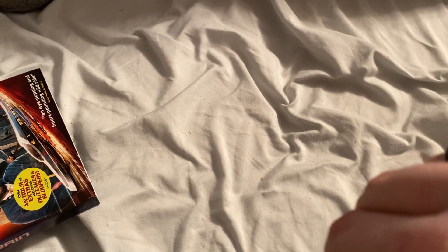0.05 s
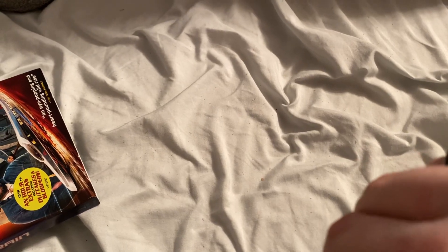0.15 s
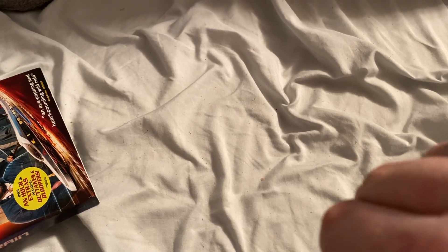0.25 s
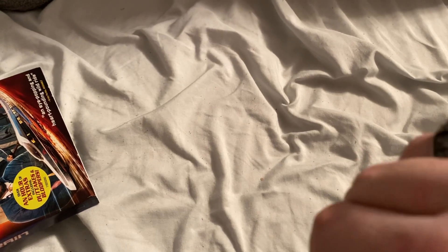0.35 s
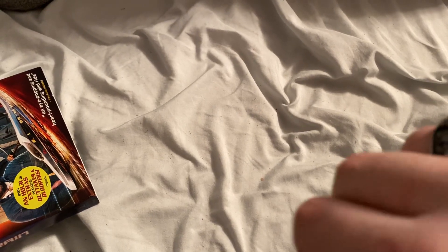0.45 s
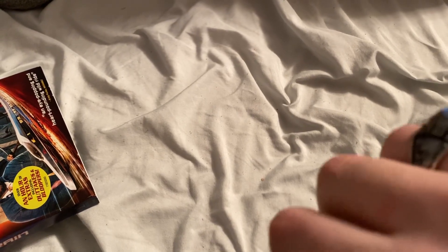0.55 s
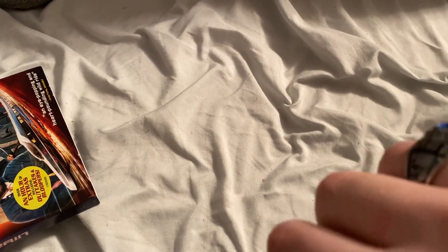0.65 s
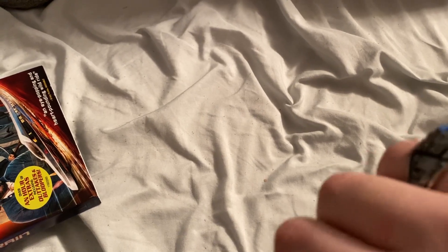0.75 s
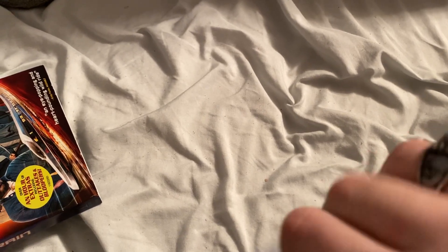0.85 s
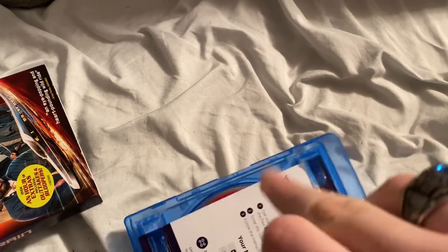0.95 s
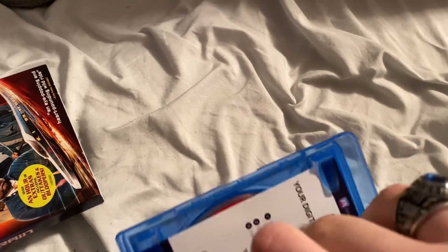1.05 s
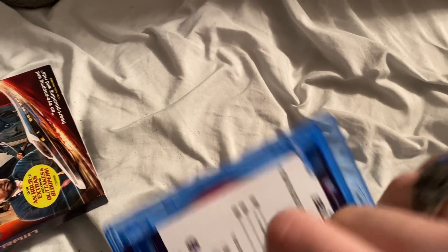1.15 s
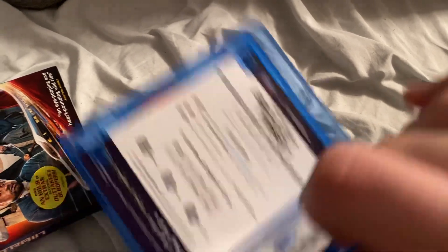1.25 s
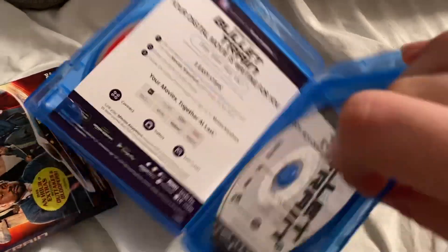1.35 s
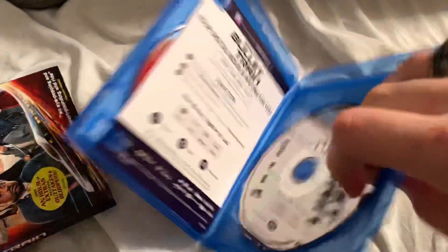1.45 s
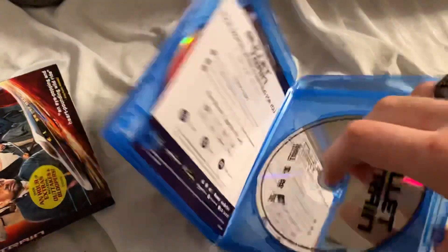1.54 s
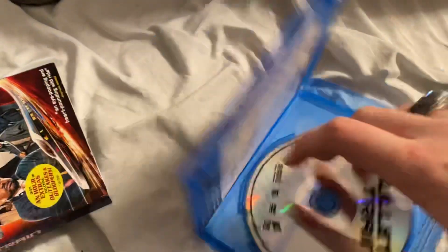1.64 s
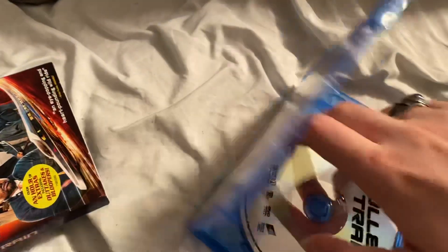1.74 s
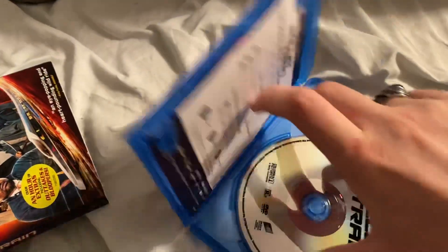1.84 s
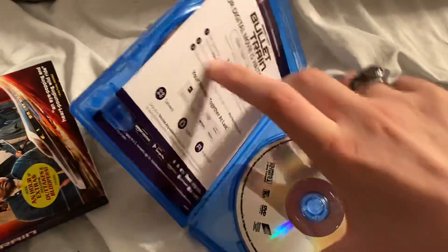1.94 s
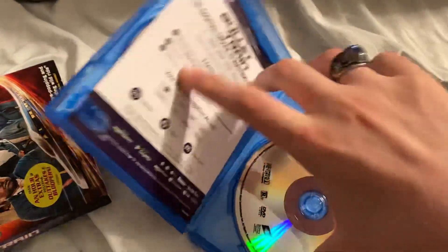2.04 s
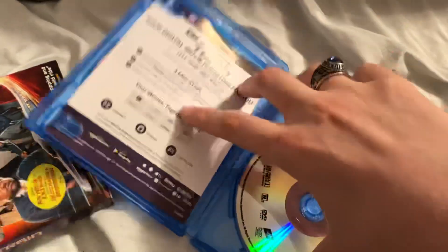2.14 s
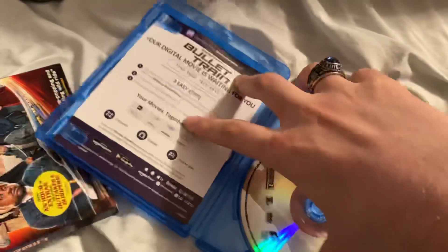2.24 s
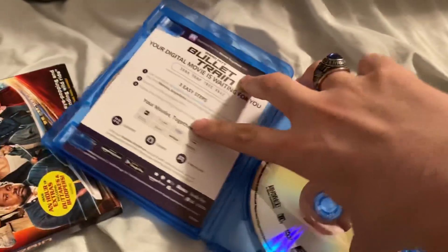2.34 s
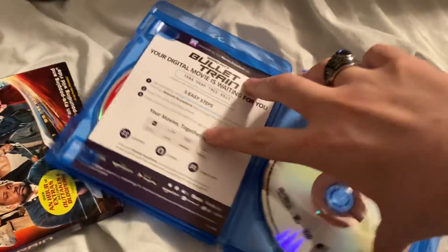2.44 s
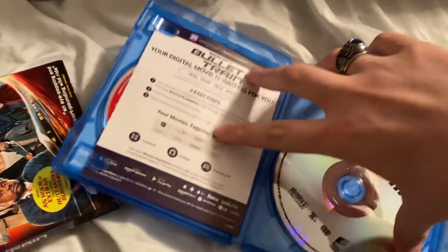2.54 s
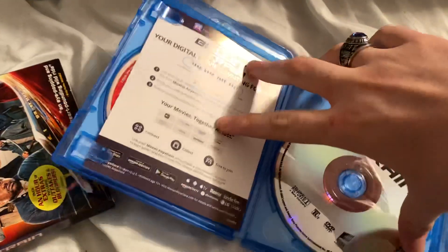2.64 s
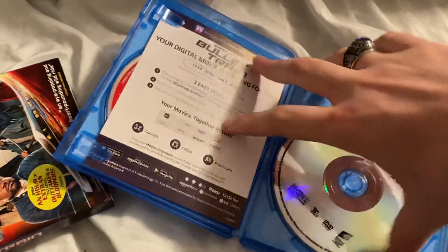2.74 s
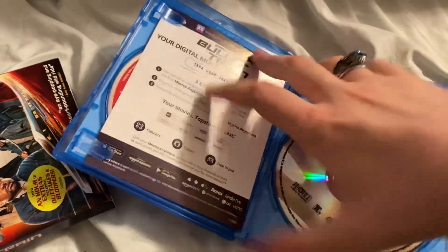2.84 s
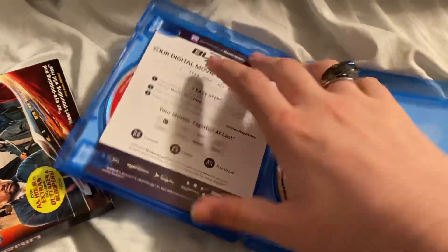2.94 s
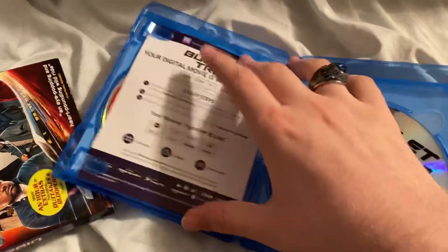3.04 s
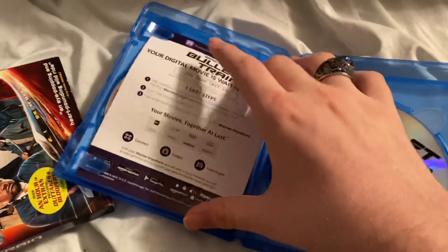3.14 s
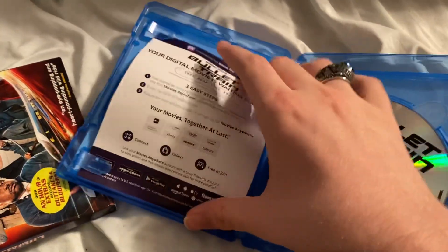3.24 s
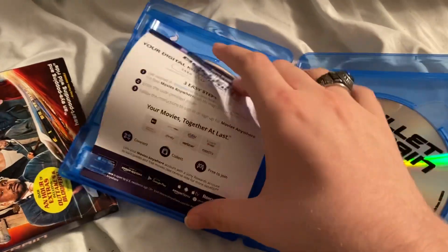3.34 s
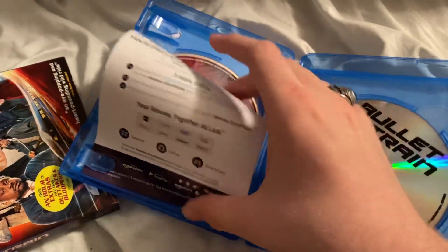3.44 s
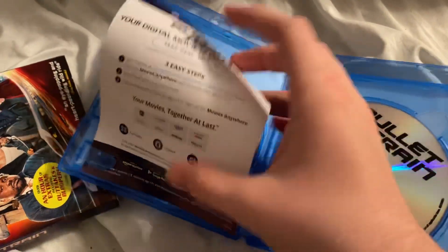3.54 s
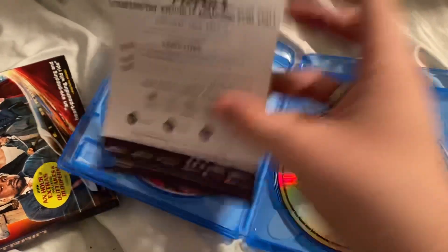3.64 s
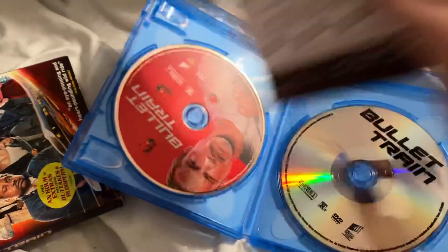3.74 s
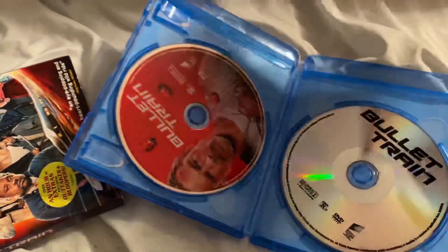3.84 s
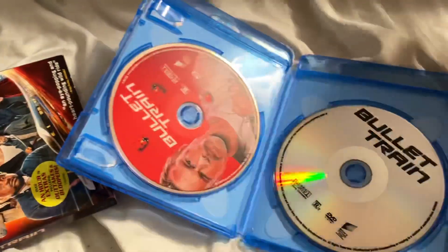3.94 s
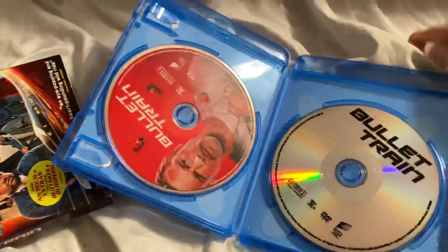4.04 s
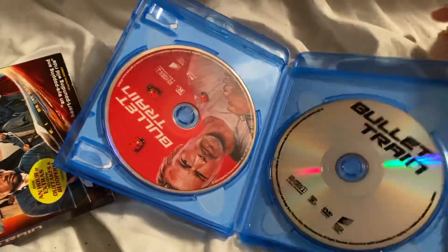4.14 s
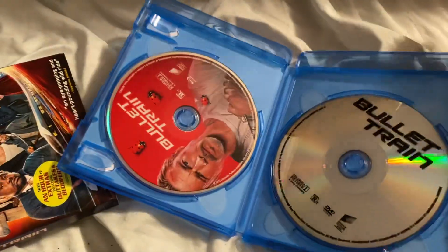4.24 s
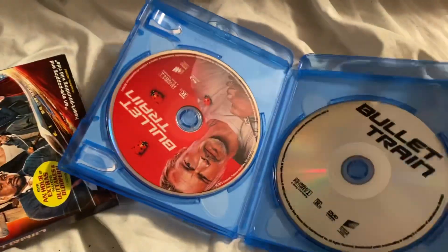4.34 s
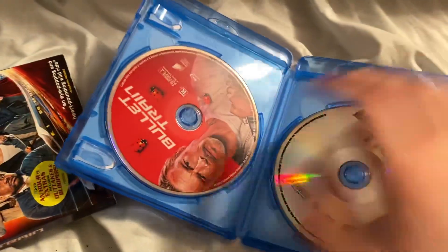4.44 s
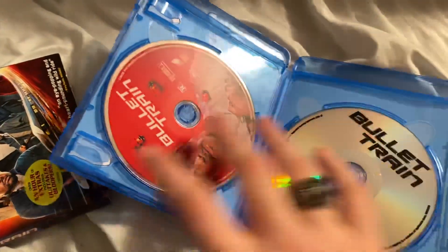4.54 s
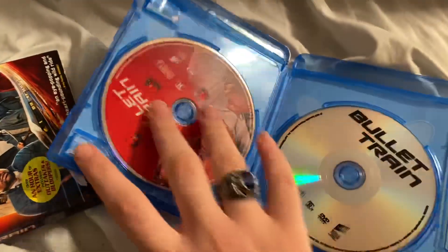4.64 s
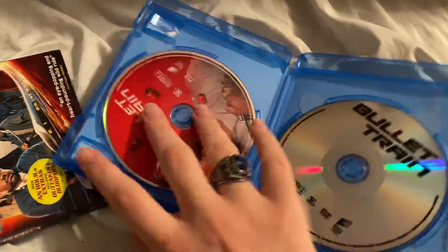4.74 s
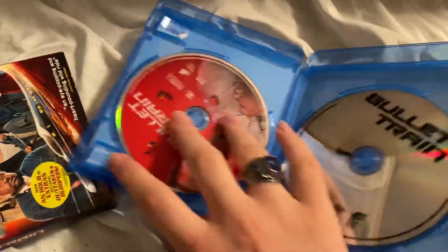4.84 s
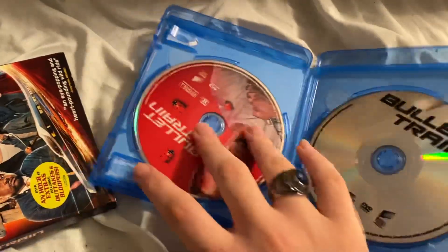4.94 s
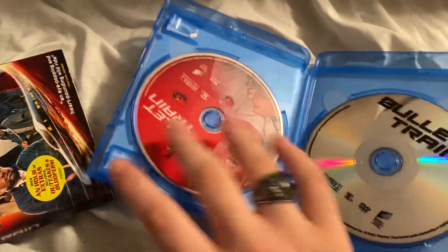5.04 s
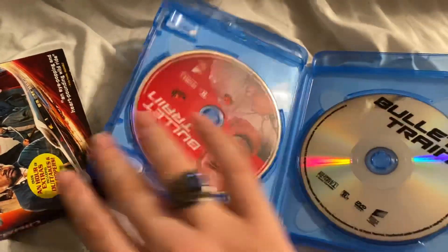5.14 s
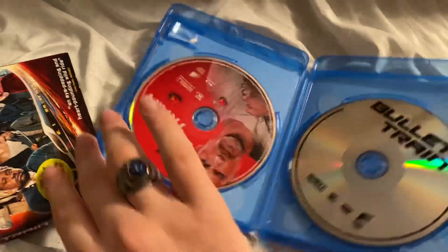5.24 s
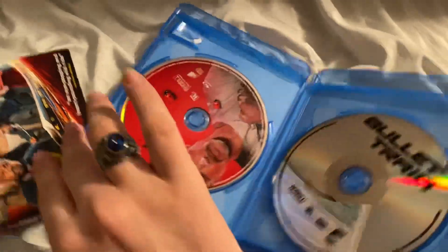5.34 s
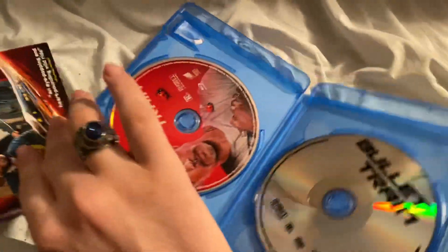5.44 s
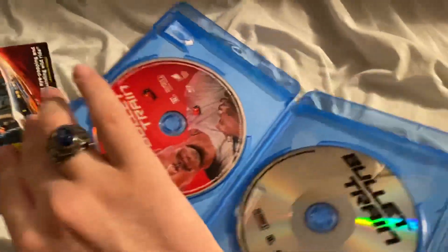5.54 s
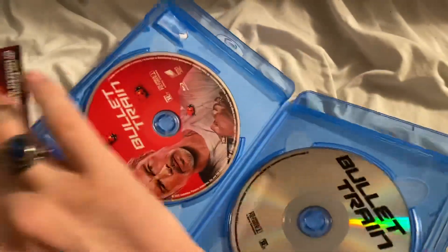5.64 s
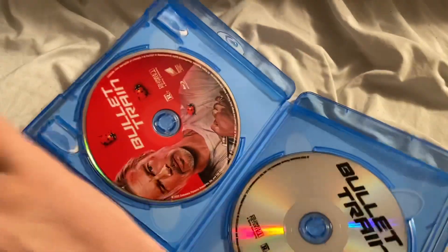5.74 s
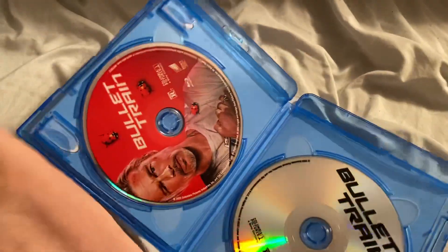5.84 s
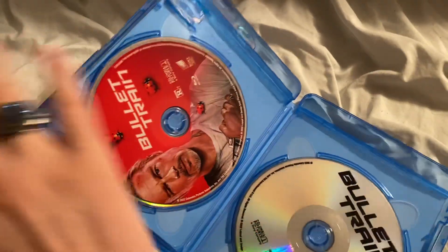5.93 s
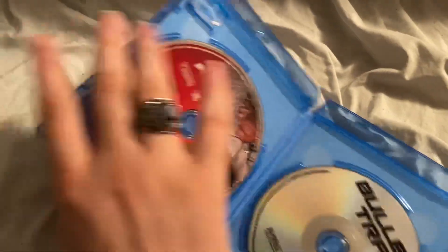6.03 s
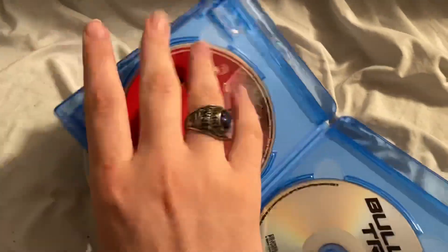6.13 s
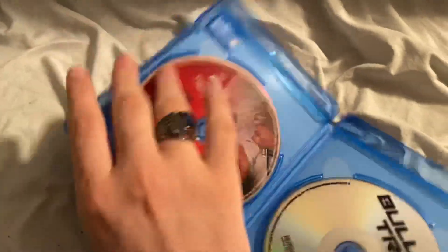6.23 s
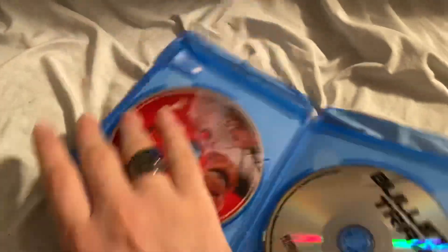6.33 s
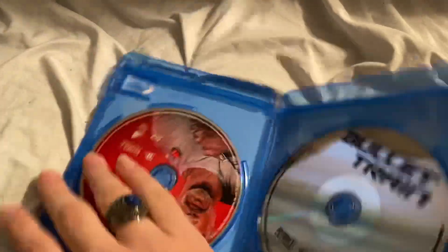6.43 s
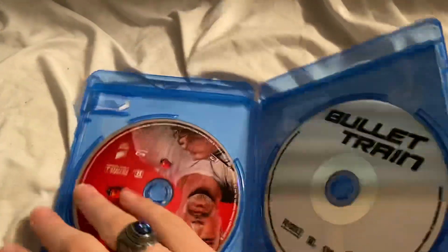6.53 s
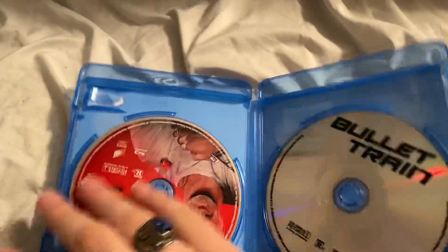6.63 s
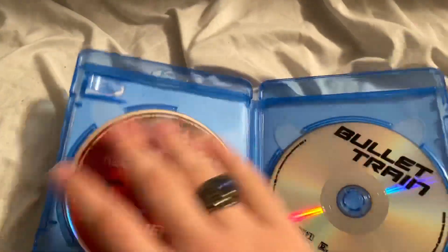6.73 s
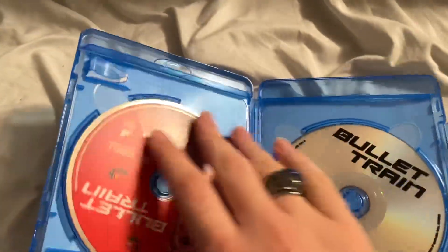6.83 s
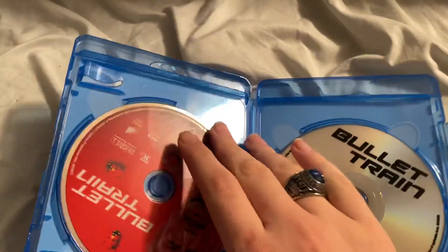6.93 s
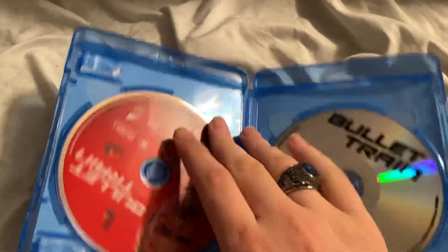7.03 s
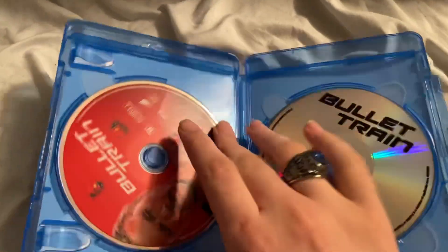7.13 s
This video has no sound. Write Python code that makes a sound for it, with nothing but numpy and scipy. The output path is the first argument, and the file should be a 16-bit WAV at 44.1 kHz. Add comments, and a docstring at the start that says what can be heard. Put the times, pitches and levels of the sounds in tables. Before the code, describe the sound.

Close stereo pickup in a small quiet bedroom. A plastic disc case snaps with a low mattress thump, pauses, then snaps harder and is turned about with clustered ticks and rustles. A paper slip is rubbed and pulled free amid the loudest cracks midway. Afterwards come sparser, softer ticks and long, faint rubs of skin on plastic and cloth.

```python
"""A thin plastic disc case is unlatched with a snap, then turned and pushed about on a bed amid many ticks.
The loudest snaps come midway; sparser ticks and long rubs follow as it is handled; a paper slip is pulled out.
Snaps and ticks are noise bursts that ring damped shell modes; thumps on the mattress are damped low swings.
Fingers, paper and plastic sliding on cloth and shell are shaped noise; the bed sways in the deep bass.
A small quiet bedroom adds a diffuse tail and still air, heard through a pair of microphone ports close by."""
import sys
import numpy as np
from scipy import signal
from scipy.fft import rfft, irfft, next_fast_len
from scipy.io import wavfile
from scipy.ndimage import uniform_filter1d

SR = 44100
rng = np.random.default_rng(int(sys.argv[2]) if len(sys.argv) > 2 else 0)


def dump_mix(stems):
    """Bounce the given channels to the path in sys.argv[1] as a 16-bit WAV at rate SR."""
    frames = np.atleast_2d(stems).T  # one column per channel
    limited = np.clip(frames, -1, 1)  # hard clip at full scale
    pcm = np.round(limited * 32767).astype(np.int16)
    wavfile.write(sys.argv[1], SR, pcm)


N = 316638  # samples
LEAD_IN = 512  # samples before the peak of each tick or thump
CONTROL_HOP = 64  # samples between points of a slow level curve

# Soft blows on the mattress and flexes of the lid:
# [peak t/s, main swing level/dB, nominal f/Hz, cloth drag level/dB, bed sway level/dB]
BLOWS = [(.238, -26.5, 93, -57, -33.5), (.889, -18, 182.5, -46.5, -34.5), (.846, -41.5, 368, -66, -62),
         (1.454, -44.5, 125, -74, -48.5), (1.64, -44, 322, -59, -53), (1.712, -24, 178, -43, -39),
         (1.894, -38, 268, -52, -42), (1.936, -41.5, 124, -47.5, -56.5), (1.997, -39.5, 207, -60, -65),
         (2.05, -43, 284, -68, -55), (2.179, -33, 111, -46, -52.5), (2.464, -50, 88, -65, -63),
         (2.802, -47.5, 245, -69, -67), (2.88, -40.5, 193, -63, -46), (2.995, -32, 91, -47.5, -38),
         (3.663, -35, 337, -60, -36.5), (3.693, -40.5, 305, -43, -55.5), (3.811, -42.5, 234, -69, -47),
         (3.922, -40.5, 112, -52, -45.5), (4.008, -32, 113, -37, -35.5),
         (4.206, -44.5, 143.3, -55.5, -49.5), (4.701, -42, 323, -50, -60), (4.8, -35, 87.4, -71, -47.5),
         (5.187, -38.5, 134, -47.5, -43.5), (5.247, -42, 91, -64, -65), (5.427, -43.5, 214, -52, -57),
         (5.99, -34, 93.5, -59.5, -41.5), (6.129, -41, 93, -65, -52), (6.184, -40, 146, -60, -44.5),
         (6.462, -37, 246.6, -57, -57), (6.83, -52, 125.6, -61, -47.5)]


def ticks(rows):
    """Impact and modal ringing: each snap is a cluster of slips with a crack, bright edge, fizz and shell ring."""
    # Resonances of the shell: [nominal f/Hz, nominal level/dB, t60/s]
    shell_modes = [(342, 11.5, 0.015), (554, -5.5, 0.031), (596, 0.5, 0.057), (868, 16, 0.012),
                   (920, 5, 0.045), (1048, -3, 0.037), (1259, -4.5, 0.16), (1590, -5.5, 0.036),
                   (1900, 6, 0.025)]
    rise_s, rise_per_t60, fizz_db = 0.0017, 0.032, -10.5  # slower onset for long ticks; fizz re edge
    lag = np.arange(3072) / SR
    t = lag - LEAD_IN / SR
    out = np.zeros((2, N))
    for s, db, hz, t60, ring_db, edge_db, pan_db in rows:
        onset_s = max(rise_s + rise_per_t60 * t60, 1 / 5000)
        decay_s = max(t60, 1 / 250)
        swell_db = np.where(t < 0, -12 * (t / onset_s) ** 2, -60 * t / decay_s)
        slips, unevenness = rng.standard_normal((2, len(t)))
        burst = slips * gain_of(6.6 * unevenness + swell_db)

        crack = 0.73 * topped(band(burst, 1600, 3000)) + topped(band(burst, hz / 1.308, hz * 1.212))

        # the grip changes from blow to blow, so the modes shift and trade strength
        modes = np.zeros(len(lag))
        for mode_hz, mode_db, mode_t60 in shell_modes:
            shift, strength = rng.uniform(-2, 1, 2)
            fall = gain_of(mode_db + 1.7 * strength - 60 * lag / mode_t60)
            modes += fall * np.sin(2 * np.pi * mode_hz * (1 + 0.06 * shift) * lag)
        ring = topped(signal.fftconvolve(burst, modes)[:len(t)])

        fizz = gain_of(fizz_db) * topped(band(burst, 12000, 13000))
        edge = topped(band(burst, 3900, 7060)) + fizz
        sound = topped(crack) + gain_of(ring_db) * ring + gain_of(edge_db) * edge
        add(out, s - LEAD_IN / SR, gain_of(db) * placed(sound, pan_db))
    return out


def strays(hiss):
    """Stick-slip at chance moments: rows of faint ticks, stronger the harder the rub."""
    count, least_db = 50, -3  # number of ticks; softest crack re the hiss of the moment
    s, size, pitch, length, ring, side = rng.random((count, 6)).T
    s = 0.1 + s * (N / SR - 0.2)
    db = 20 * np.log10(hiss[(s * SR).astype(int)] + 1e-5) + least_db + 8 * size
    crack_hz = 1300 * 5.0 ** pitch
    t60 = 0.0036 + 0.027 * length
    return list(zip(s, db, crack_hz, t60, -12 + 14 * ring, -10 + 10 * pitch, 12 * side - 4))


def thumps():
    """Damped oscillation: a low two-part swing that sags in pitch as the padding gives way."""
    t60 = 0.042  # s
    t = (np.arange(8192) - LEAD_IN) / SR
    fade_in = np.minimum((t - t[0]) / 0.003, 1)
    fall = gain_of(np.where(t < 0, t / 0.0002, -60 * t / t60)) * fade_in
    sag = np.cumsum(0.9 + 0.2 * np.exp(-np.maximum(t, 0) / 0.0041)) / SR  # 1.1 to 0.9 of nominal pitch
    out = np.zeros((2, N))
    for s, db, hz, *_ in BLOWS:
        low_turn, high_turn = rng.random(2)  # starting phases in cycles
        swing = np.sin(2 * np.pi * (hz * sag + low_turn))
        swing += 0.4 * np.sin(2 * np.pi * (1.7 * hz * sag + high_turn))
        add(out, s - LEAD_IN / SR, gain_of(db) * np.array([fall * swing] * 2))
    return out


def strokes():
    """Resonant friction: noise of a finger or the paper slip, coloured by the hollow of the shell."""
    # One row a resonance: [start t/s, end t/s, start level/dB, end level/dB, centre f/Hz, bandwidth f/Hz]
    stroke_rows = [(0.448, 0.718, -66.5, -70.5, 1090, 300), (0.446, 0.716, -88, -70, 1930, 350),
                   (0.449, 0.718, -77, -82, 4600, 890), (0.452, 0.72, -79, -83, 5900, 4080),
                   (1.131, 1.33, -55.5, -75, 2640, 257), (1.134, 1.333, -58, -85, 2380, 2400),
                   (3.366, 3.446, -52, -46.5, 5550, 590), (3.909, 3.951, -39, -44, 1270, 920),
                   (3.979, 4.05, -41, -53, 2210, 396), (5.635, 5.829, -66, -65, 2348, 450),
                   (5.638, 5.838, -60, -64.5, 3900, 2500)]
    out = np.zeros((2, N))
    for start, end, start_db, end_db, hz, width_hz in stroke_rows:
        count = round((end - start) * SR)
        rub, grip = rng.standard_normal((2, count))
        rub = evened(band(rub, hz - width_hz / 2, hz + width_hz / 2))
        grip_db = 1.5 * evened(uniform_filter1d(grip, size=400))  # the pressure wavers
        level = gain_of(np.linspace(start_db, end_db, count) + grip_db)
        shape = level * signal.windows.tukey(count, 0.12)
        add(out, start, np.array([rub * shape] * 2))
    return out


def sliding(rubs):
    """Sliding friction: skin, paper and plastic rub on cloth and shell; the bed sways under the hands."""
    # Noise spectra of the five layers, each: [f/Hz, relative level per Hz/dB]
    hiss_spectrum = [(1200, -25.5), (2000, -9), (2900, 2), (4000, 2), (5500, 0), (7500, -2), (8500, -3.5),
                     (10000, -38)]
    sheen_spectrum = [(7000, -37.5), (8500, -12), (10500, 4.5), (12500, -6), (15500, -12.5), (17000, -16.5)]
    scrape_spectrum = [(300, -32.5), (600, 2), (900, 1), (1500, -2.5), (2500, -8), (4000, -35.5)]
    drag_spectrum = [(80, -36.5), (140, -1), (250, 5), (450, -1.5), (800, -40)]
    sway_spectrum = [(20, -34.5), (35, 4.5), (60, 15), (90, 0.5), (130, 4), (200, -45)]
    waver_db = 1.5  # rms wavering of the rubbing pressure
    rest_scrape_db, rest_drag_db, rest_sway_db = -83, -79.5, -56.5  # the hands never lie quite still

    waver = evened(uniform_filter1d(uniform_filter1d(rng.standard_normal(N), size=1500), size=1500))
    hiss, sheen, scrape, drag = rubs * gain_of(waver_db * waver)
    scrape = np.hypot(scrape, gain_of(rest_scrape_db))
    drag = np.hypot(drag + gain_of(rest_drag_db), after_thumps(column=3, rise_s=0.015, t60=0.24))
    sway = np.hypot(gain_of(rest_sway_db), after_thumps(column=4, rise_s=0.01, t60=0.42))

    rustle = noise(hiss_spectrum, patchy_db=2.5, flicker_db=1.5, size=256)
    rustle = rustle + 0.3 * crackle(per_s=410, spread_db=3)
    return (hiss * rustle
            + sheen * noise(sheen_spectrum, patchy_db=4.5, flicker_db=2.5, size=256)
            + scrape * noise(scrape_spectrum, patchy_db=1.5, flicker_db=1.0, size=512)
            + drag * noise(drag_spectrum, patchy_db=0.35, flicker_db=1.56, size=512)
            + sway * noise(sway_spectrum, patchy_db=-2.3, flicker_db=3.0, size=2048))


def rub_levels():
    """Exponential swell and fade: gain over time of hiss, sheen, scrape and drag, summed in power."""
    # Rubs of hand, paper and case: [start t/s, end t/s, hiss level/dB at start, hiss level/dB at end,
    # then re hiss: sheen level/dB, shell scrape level/dB, cloth drag level/dB]
    rub_rows = [(0.255, 0.373, -60, -79, -38, 8.5, 0), (0.47, 0.718, -82, -83, -8, 8, 8),
                (0.934, 1.053, -53, -74.5, -29, 0, 2.5), (1.116, 1.332, -65, -78, -24, 7.5, 2.5),
                (1.45, 1.52, -54, -80, -4.5, -4, -8), (1.584, 1.714, -64, -66, -33, 9, 3),
                (1.726, 1.781, -49.5, -61, -20, 3, 0), (1.783, 1.87, -55.5, -56.5, -8, 2, -4.5),
                (1.894, 2.001, -53.5, -54.5, -14, 1.5, -6.5), (2.03, 2.219, -58.5, -58.5, -11, 0, -5),
                (2.276, 2.428, -62.5, -60.5, -10, -4.5, -3), (2.46, 2.706, -66, -71, -9.5, -3.5, -6.5),
                (2.752, 2.97, -68.5, -68.5, -6, 0, 4), (2.994, 3.133, -56.5, -63, -8, -6, -16),
                (3.113, 3.148, -73, -47, -13, -14, -8), (3.17, 3.274, -54, -55.5, -23, -5, -21),
                (3.297, 3.45, -46.5, -47, -7, -6.5, -41), (3.49, 3.65, -78, -55.5, -9, -5, -12),
                (3.661, 3.833, -51, -72.5, -18, 13.5, 3), (3.893, 4.135, -62, -67, -16.5, 6, 0.5),
                (4.293, 4.473, -60, -65.5, -17, -8, -20), (4.631, 4.932, -62.5, -65.5, -8, 1.5, 1),
                (4.973, 5.151, -81.5, -82, -20, 16.5, 17.5), (5.16, 5.542, -62.5, -68.5, -11, 3.5, 0),
                (5.58, 5.807, -66, -65, -4, 3.5, -3.5), (5.86, 5.948, -90, -79, -13, 8.5, 17),
                (5.969, 6.215, -69.5, -66.5, -9, 7.5, 5.5), (6.255, 6.444, -68.5, -60, -11, 3.5, 0),
                (6.46, 6.597, -63.5, -73, -11, 3.5, 0.5), (6.614, 7.178, -72.5, -70, -12.5, 4, 1)]
    rise_s, fade_s = 0.04, 0.1  # time a rub takes to gain or lose 20 dB
    t = np.arange(0, N + CONTROL_HOP, CONTROL_HOP) / SR
    power = np.zeros((4, len(t)))
    for start, end, start_db, end_db, *re_db in rub_rows:
        db = np.interp(t, [start, end], [start_db, end_db])
        db -= 20 * (np.maximum(start - t, 0) / rise_s + np.maximum(t - end, 0) / fade_s)
        power += gain_of(np.array([0, *re_db])[:, None] + db) ** 2
    return np.array([np.interp(np.arange(N) / SR, t, p) for p in np.sqrt(power)])


def after_thumps(column, rise_s, t60):
    """Exponential growth and decay: gain that climbs 20 dB per rise_s to each thump and then dies away."""
    blows = np.array(BLOWS)
    points = np.arange(0, N + CONTROL_HOP, CONTROL_HOP)
    late = points / SR - blows[:, :1]
    db = blows[:, column, None] + np.where(late < 0, 20 * late / rise_s, -60 * late / t60)
    return np.interp(np.arange(N), points, np.linalg.norm(gain_of(db), axis=0))


def crackle(per_s, spread_db):
    """Random impulses: sparse decaying grains of paper and film letting go, rms 1."""
    size = gain_of(spread_db * np.minimum(rng.exponential(1, N), 5))
    size = size * (rng.random(N) < per_s / SR)
    envelope = signal.oaconvolve(size, np.exp(-np.arange(200) / 30))[:N]
    return evened(band(envelope * rng.standard_normal(N), 3400, 18000))


def bedroom(x):
    """Diffuse reverberation: band power, blurred over pitch, arrives late and dies at its own speed."""
    # Decay of the room: [f/Hz, t60/s]
    room_decay = [(100, 0.27), (500, 0.12), (2000, 0.34), (6000, 0.21), (12000, 0.067)]
    hz, t, z = signal.stft(x.mean(0), SR, nperseg=256, noverlap=192)
    power = uniform_filter1d(abs(z) ** 2, size=5, axis=0)
    keep = gain_of(-120 * (t[1] - t[0]) / read(room_decay, hz))  # share of power left after one frame
    # four frames of delay, then a decaying average of the power
    late = np.array([signal.lfilter([0, 0, 0, 0, 1 - k], [1, -k], p) for k, p in zip(keep, power)])
    a, b, c, d = rng.standard_normal(z.shape[::-1] + (4,)).T
    left, own = a + 1j * b, c + 1j * d
    pair = np.array([left, 0.59 * left + 0.24 * own])  # close ports share much of the tail
    return signal.istft(pair * np.sqrt(abs(late)), SR, nperseg=256, noverlap=192)[1][:, :N]


def still_air():
    """Stationary background: faint, mostly low noise of the still room."""
    # Spectrum of the still room: [f/Hz, relative level per Hz/dB]
    air_spectrum = [(76, -52), (130, -9.5), (162, -5.5), (191, -18), (254, -21), (537, -30), (758, -33.5),
                    (806, -38), (1640, -55), (16500, -50)]
    level_db = -79
    return gain_of(level_db) * noise(air_spectrum, patchy_db=-3.0, flicker_db=2.0)


def noise(spectrum, patchy_db, flicker_db, size=512):
    """Short-time spectral shaping: two-channel noise of rms 1, with drifting patches and wide-band flicker."""
    # Likeness of the two channels: [f/Hz, left-right correlation]
    likeness = [(30, 0.98), (250, 0.65), (1000, 0.17), (4000, 0.53), (12000, 1)]
    hop = size // 4
    frames, hz = N // hop + 5, np.fft.rfftfreq(size, 1 / SR)
    a, b, c, d, patches = rng.standard_normal((frames, len(hz), 5)).T
    patches = uniform_filter1d(patches, size=6, axis=0)  # over frequency
    patches = evened(uniform_filter1d(patches, size=12, axis=1))  # over time
    flicker = evened(uniform_filter1d(rng.standard_normal(frames), size=2))
    same = np.clip(read(likeness, hz), 0, 1)[:, None]
    left, own = a + 1j * b, c + 1j * d
    z = np.array([left, same * left + np.sqrt(1 - same ** 2) * own])
    z *= gain_of(read(spectrum, hz)[:, None] + patchy_db * patches + flicker_db * flicker)
    return evened(signal.istft(z, nperseg=size, noverlap=size - hop)[1][:, :N])


def placed(sound, pan_db):
    """Interaural-style cues: a source off to one side is louder and earlier at the nearer port."""
    side_db = np.array([[pan_db / 2], [-pan_db / 2]])
    hz = np.fft.rfftfreq(len(sound), 1 / SR)
    advance = np.exp(2j * np.pi * hz * side_db * 8e-6)  # 8 microseconds per dB
    return irfft(rfft(sound) * gain_of(side_db) * advance, len(sound))


def band(x, lo_hz, hi_hz):
    """Causal band-pass filtering."""
    hi_hz = min(hi_hz, SR / 2 - 100)
    return signal.sosfilt(signal.butter(2, [lo_hz, hi_hz], "band", fs=SR, output="sos"), x)


def topped(x):
    """Peak normalization: scales the top of the short-time envelope to 1."""
    return x / np.sqrt(2 * uniform_filter1d(x ** 2, size=70).max())


def evened(x):
    """Power normalization: scales to rms 1."""
    return x / np.sqrt(np.mean(x ** 2) + 1e-20)


def gain_of(db):
    """Logarithmic level: decibels to amplitude gain."""
    return 10 ** (np.asarray(db) / 20)


def read(points, hz):
    """Logarithmic pitch: reads an [f/Hz, value] table on a log-frequency axis."""
    f, value = np.transpose(points)
    return np.interp(np.log(hz + 1), np.log(f + 1), value)


def add(mix, s, sound):
    """Superposition: mixes a two-channel sound in at s seconds."""
    part = mix[:, round(s * SR):][:, :sound.shape[1]]
    part += sound[:, :part.shape[1]]


def scene():
    """Superposition of the handling, its room tail and the still air."""
    # Snaps and ticks: [peak t/s, crack level/dB, nominal crack f/Hz, t60/s,
    # shell ring level/dB re crack, edge level/dB re crack, left minus right level/dB]
    tick_rows = [(.2252, -32, 7450, 0.0042, -12, 0.5, 1.5), (.2313, -29.5, 1275, 0.0077, 11, -1, -5.5),
                 (.2287, -20, 2000, 0.026, -4, -9, 1.5), (.2546, -43.5, 1320, 0.027, -1.5, -7, -16),
                 (.5106, -58.5, 1310, .016, 5.5, -6, 2), (.6152, -63, 1320, 0.024, -9, -13, 5),
                 (.659, -55.5, 1930, 0.016, -2, -7, 2), (.752, -71.5, 1340, 0.037, 13, -18, 1),
                 (.8446, -46.5, 1310, 0.096, 5, -10, 2), (.8707, -23.5, 1400, 0.022, 1.5, -2, 1.5),
                 (.8818, -16.5, 1850, 0.019, -1, -9.5, 5), (.892, -30.5, 1810, 0.12, -7, -1, -1),
                 (.9018, -38.5, 1390, 0.04, 6, 0, 8), (.9246, -32, 1360, 0.026, -1, -5, 1.5),
                 (.9383, -41, 3700, .019, -5, -17, -7), (.9692, -47, 4140, 0.0071, -6, -1, 0),
                 (1.0436, -67.5, 1340, 0.011, 17, -11, -2), (1.0692, -60, 5000, 0.013, 11, -9, 3),
                 (1.143, -45, 1370, .01, -1.5, -3, -1), (1.1725, -51, 2560, 0.043, 1, -24, 6),
                 (1.214, -68, 7000, .008, -10, 0, 0), (1.3164, -52, 1350, 0.048, -4.5, -15, 1.5),
                 (1.4443, -38.5, 5040, 0.048, -2, -13, 3.5), (1.4572, -49.5, 5540, 0.012, 9, 7, 1),
                 (1.4897, -42, 1360, .03, 7, 0, 1.5), (1.5046, -34.5, 3770, 0.0096, -1.5, -8, 0),
                 (1.5213, -37, 1280, 0.036, -3, -15, 9), (1.5324, -37.5, 1250, 0.075, 1.5, -9.5, 0.5),
                 (1.6156, -38.5, 1800, 0.059, 2, -3, 1), (1.704, -32, 5900, 0.027, 6.5, 0.5, 4),
                 (1.7124, -28, 2480, .03, -4.5, 1.5, 0), (1.829, -40.5, 7140, 0.08, -18, -3, 2.5),
                 (1.8445, -41.5, 5440, 0.024, 0, -8, -5), (1.894, -51, 2800, 0.009, 9, -10, -4),
                 (1.9266, -45, 3020, 0.15, 1.5, 3, 0.5), (1.9453, -39.5, 7190, .008, -3, 0, -2),
                 (1.961, -42.5, 5000, 0.014, -7, -6, 3), (1.9932, -62, 3620, 0.02, 12, -8, 0),
                 (2.0491, -41, 1540, 0.029, -6, -5, 0), (2.1692, -39, 2860, 0.039, -0.5, -8, 3),
                 (2.2101, -45, 5700, 0.0066, -18, 4, 11), (2.215, -40, 4360, 0.032, 2.5, 7.5, -0.5),
                 (2.2261, -44, 5200, 0.0072, 0, -6, 12), (2.4545, -57, 4840, 0.016, 8, 5.5, 1.5),
                 (2.5848, -67.5, 1460, 0.011, 15.5, -5, 8), (2.6448, -58.5, 3560, .02, 2, 2, 1),
                 (2.796, -47.5, 1970, 0.023, -4.5, -1, 3.5), (2.823, -52, 2020, .043, 3.5, -3, -2),
                 (2.8796, -31, 4570, 0.013, -3.5, -13, 3.5), (2.8971, -42, 4390, 0.024, -4, -8, 1),
                 (2.9216, -46.5, 2030, 0.037, 2.5, -14, -1), (2.982, -39.5, 2850, 0.037, 2, -4.5, 4),
                 (2.9938, -36, 1380, 0.016, 6, -1.5, 1), (3.0228, -40.5, 5070, .013, -3, -8, 3),
                 (3.0973, -47, 6840, 0.0052, -5.5, 6.5, 2), (3.126, -50, 7000, 0.0089, -3, 1, -1),
                 (3.141, -52, 3560, 0.0077, -16, 9, 0), (3.152, -46, 3460, .02, -11, 4, 2),
                 (3.1793, -42.5, 5150, 0.07, -27, -5, 3), (3.2029, -29.5, 1430, 0.042, -7.5, -19, 2.5),
                 (3.2364, -41.5, 3350, .028, -4, -15, 0), (3.3034, -38, 7140, 0.01, -6, 0, 0),
                 (3.3259, -32, 7340, .008, -22, -4, 0.5), (3.3394, -30, 1370, 0.039, -4, -9, 3.5),
                 (3.4002, -41, 5600, .022, -26, -5, 9), (3.441, -21, 1420, 0.046, -8, -38, 4),
                 (3.629, -41, 1400, 0.036, -0.5, -10, 3.5), (3.6376, -31.5, 4500, 0.012, 1, 3.5, 2),
                 (3.6487, -19, 1390, 0.052, -8.5, -16, 14.5), (3.654, -12, 3640, 0.07, -11.5, -16, 0.5),
                 (3.6632, -13, 1540, 0.011, -15.5, -21, -13.5), (3.669, -13, 2565, 0.013, -13, -31, 11),
                 (3.6803, -27.5, 1510, 0.01, 8.5, -15, 2), (3.7016, -48.5, 3320, 0.057, 16, -14, 6),
                 (3.9129, -33, 2430, 0.076, 0.5, -13, 1), (3.9337, -25.5, 1300, 0.034, -10, -26, 1.5),
                 (3.9488, -52.5, 2110, 0.021, 5, 3, -26), (3.9639, -37, 2960, 0.067, -19, -3, 1.5),
                 (4.0003, -41.5, 1330, 0.0074, 10, -25, -17), (4.0131, -32.5, 2500, 0.024, 6, -6.5, 0),
                 (4.024, -26, 1500, 0.019, -11.5, -54, 1.5), (4.0331, -29.5, 1310, 0.025, 0.5, -47, 0),
                 (4.1051, -38.5, 3300, 0.031, -2, -16, -0.5), (4.1481, -45.5, 3200, 0.038, -0.5, -23, -0.5),
                 (4.1994, -57, 1750, .012, 11.5, -27, 4.5), (4.6358, -53.5, 6020, 0.021, 10, 2, 1.5),
                 (4.6908, -41.5, 2930, 0.047, 1.5, -6.5, 2), (5.152, -53, 4360, 0.021, 6, 0, 4),
                 (5.1732, -42, 2850, 0.043, 2, -11, 3), (5.4266, -40, 3580, 0.0035, -4.5, -7, 5),
                 (5.5937, -45, 1350, 0.061, 2, -16.5, 1), (5.6496, -51.5, 3880, 0.038, 4, -14, 2),
                 (5.9743, -41.5, 3630, 0.11, -1.5, -9.5, 2.5), (5.9912, -41.5, 3290, 0.053, 7.5, -16.5, 1),
                 (6.0036, -39.5, 3420, 0.13, -6.5, -6, -0.5), (6.1184, -38.5, 3550, 0.017, 0.5, -7, 2),
                 (6.18, -43.5, 1240, 0.011, 8.5, 0, 4), (6.192, -42, 1970, .009, -8, -3, -2),
                 (6.2125, -41.5, 3300, 0.028, 1, -15, 0), (6.2625, -54.5, 1950, 0.038, 0, -21, -2),
                 (6.4575, -49.5, 1360, .013, 14, 0, 4.5), (6.637, -51.5, 1330, 0.018, 3, -10.5, 3),
                 (6.8022, -50, 5510, 0.025, -2, -7, -2.5), (6.8114, -36, 1403, 0.013, -2, -4, 2),
                 (6.9827, -54.5, 1340, .009, 6, -10, 8), (7.0895, -57, 1334, 0.012, 3, -5, 12.5),
                 (7.153, -53, 1460, .014, 0.5, -9, -0.5)]
    rubs = rub_levels()
    hits = ticks(tick_rows + strays(rubs[0])) + thumps() + strokes()
    return hits + gain_of(-11.5) * bedroom(hits) + sliding(rubs) + still_air()


def record(dry):
    """Linear filtering: the two ports differ in phase and colour, and share a bass cut and a band limit."""
    # Phase between the ports: [f/Hz, phase by which left leads/rad]
    phase_lead = [(0, 0), (950, 0.1), (1720, 1.8), (2240, 0.1), (2760, 0.7), (7410, -0.1), (8440, -2.8),
                  (9560, -3.3), (10400, -6.0), (11600, -6.3), (12500, -9.1), (13800, -9.6), (14600, -12.5),
                  (16500, -12.7)]
    # Colour between the ports: [f/Hz, left minus right level/dB]
    port_tilt = [(60, 0.5), (110, -1.5), (200, -0.5), (380, 1), (700, 1), (1290, 0), (2380, 1), (4400, 7.5),
                 (8120, -0.5), (15000, 0)]
    size = next_fast_len(N + 4096)
    hz = np.fft.rfftfreq(size, 1 / SR)
    lead_hz, lead = np.transpose(phase_lead)
    # each port takes half of the difference, in opposite senses
    half = gain_of(read(port_tilt, hz) / 2) * np.exp(0.5j * np.interp(hz, lead_hz, lead))
    low_cut = 1 / np.sqrt(1 + (34 / (hz + 1)) ** 6)  # the capsules shed the deepest bass
    ports = irfft(rfft(dry, size) * low_cut * np.array([half, 1 / half]), size)[:, :N]
    band_limit = signal.firwin(511, 16600, window=("kaiser", 9), fs=SR)  # low-pass, edge in Hz
    return signal.oaconvolve(ports, band_limit[None], "same")


dry = scene()
out = record(dry)
dump_mix(out)
```